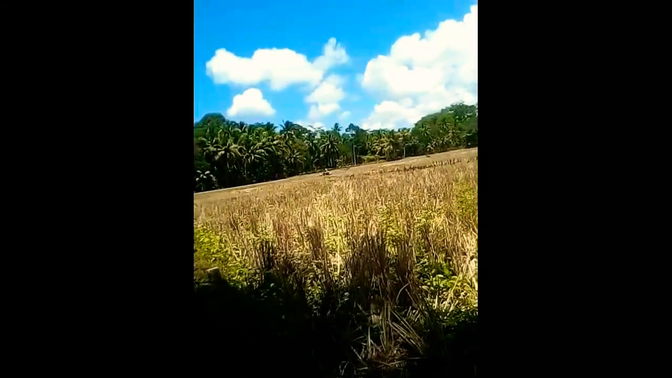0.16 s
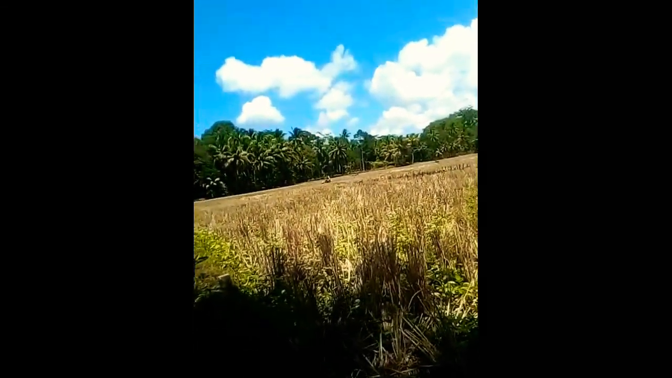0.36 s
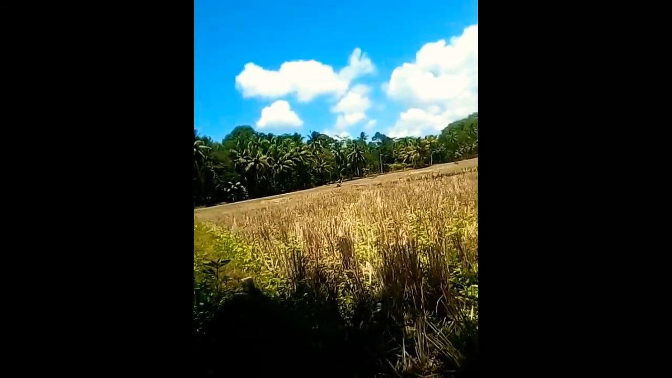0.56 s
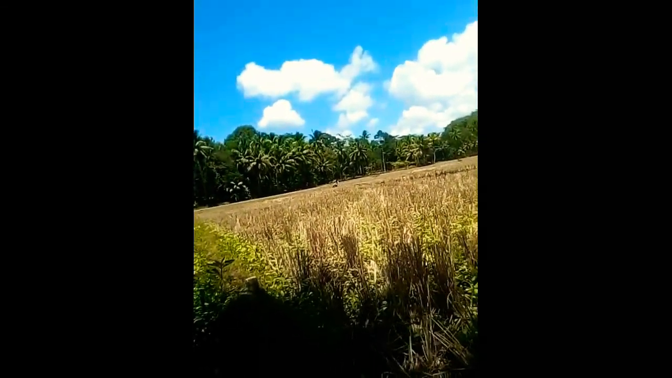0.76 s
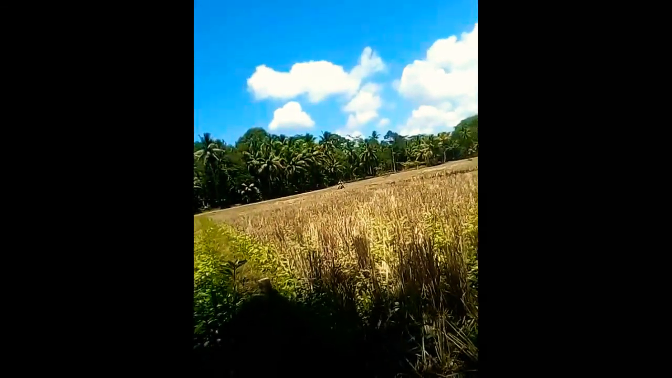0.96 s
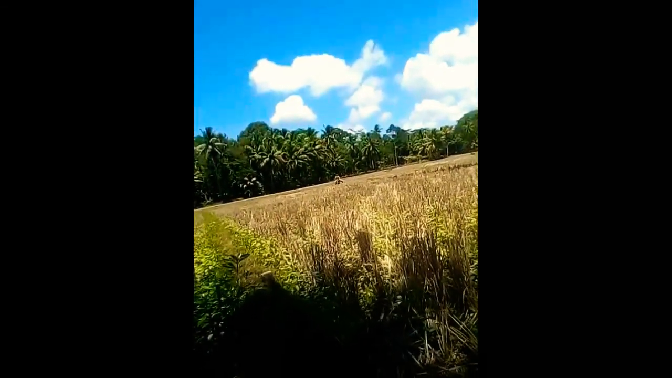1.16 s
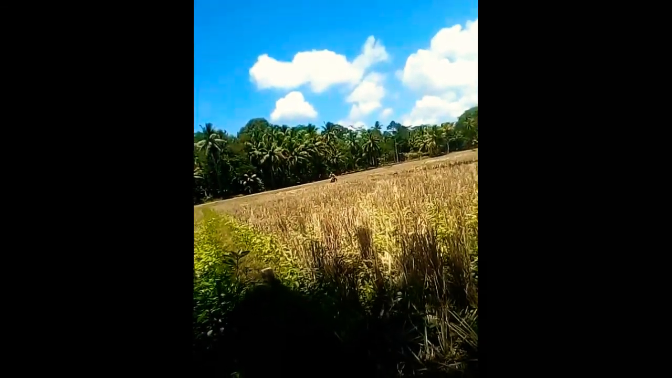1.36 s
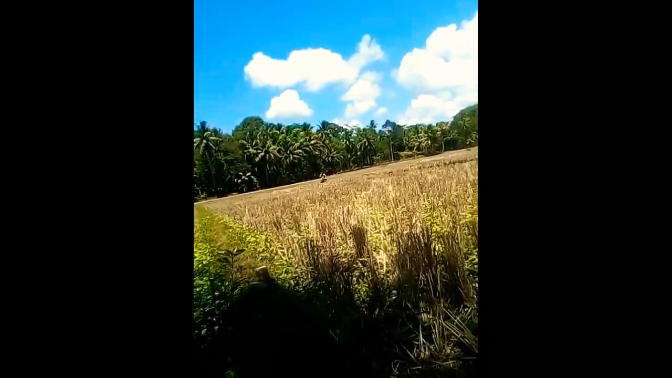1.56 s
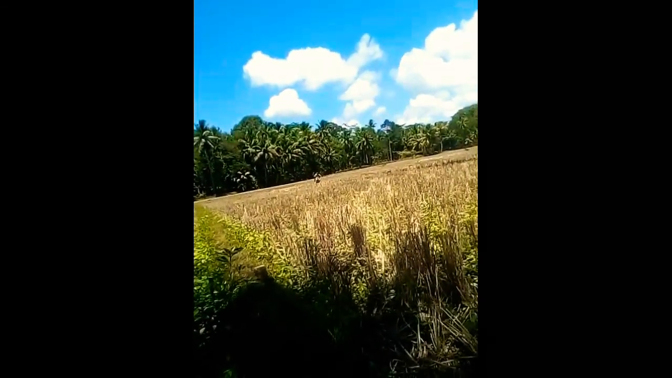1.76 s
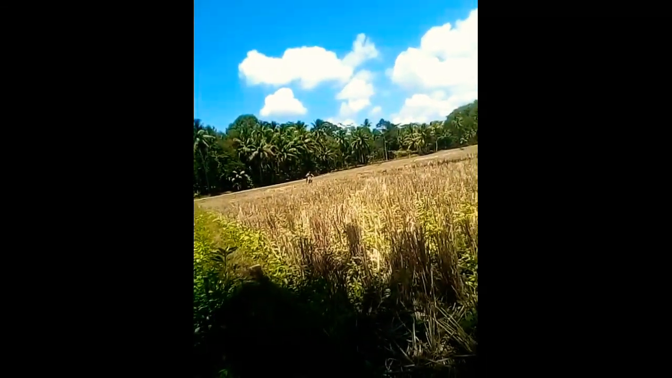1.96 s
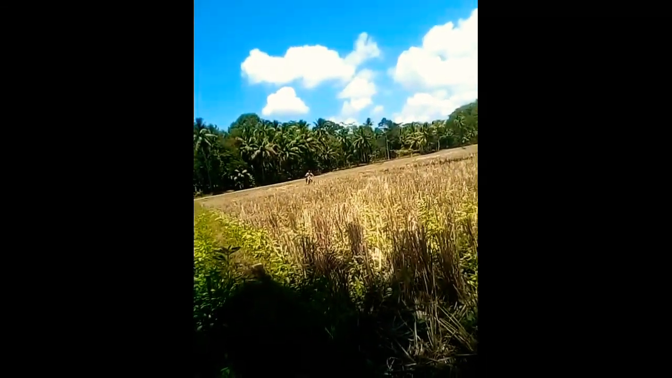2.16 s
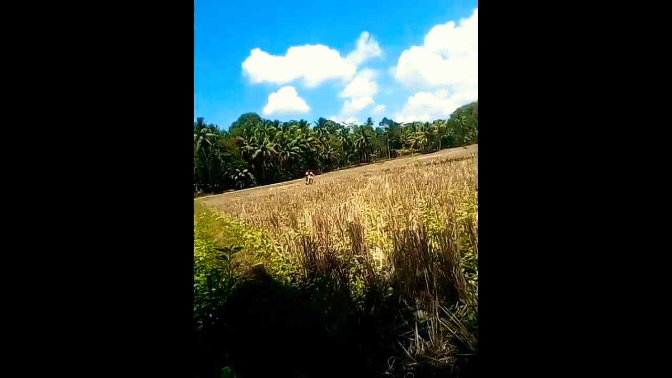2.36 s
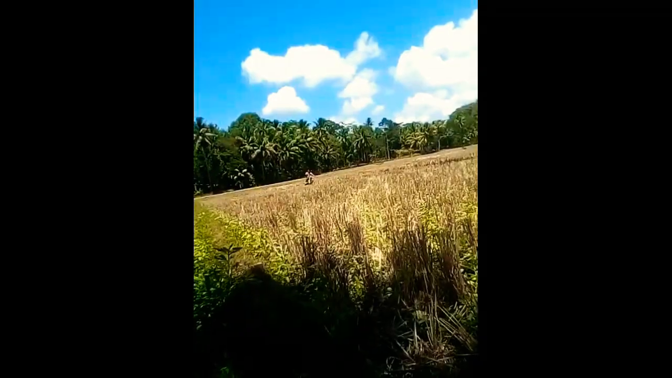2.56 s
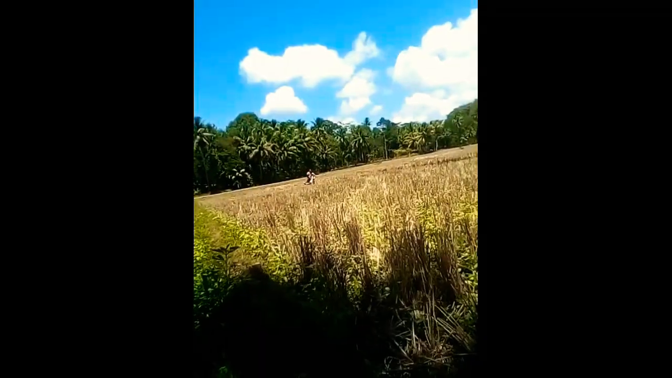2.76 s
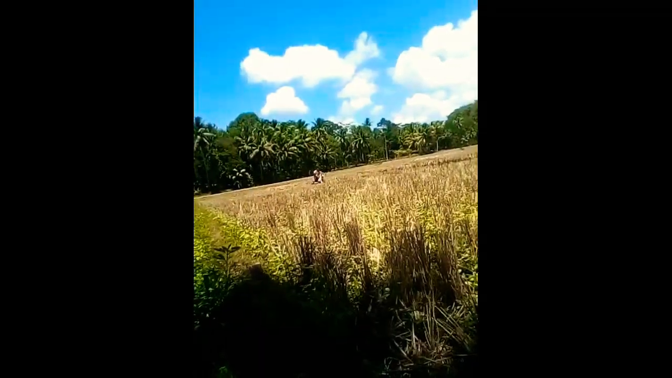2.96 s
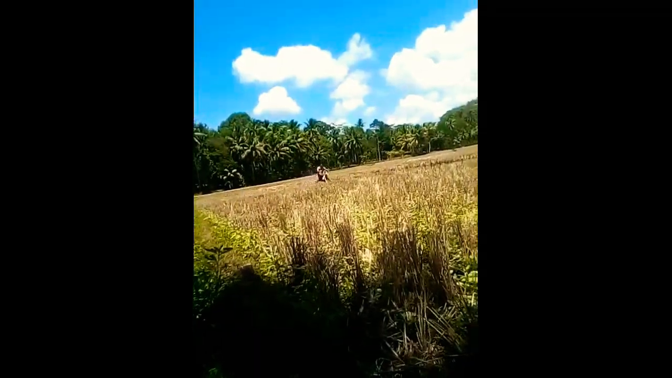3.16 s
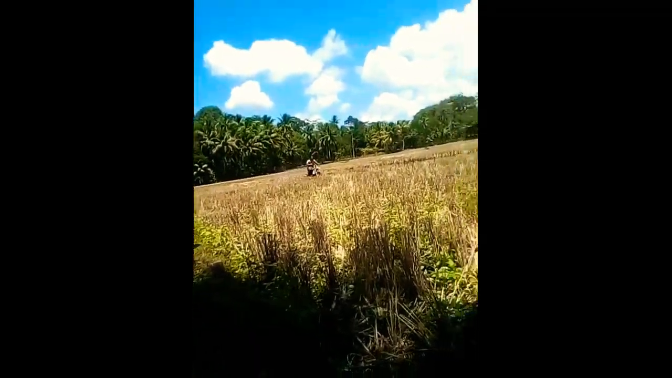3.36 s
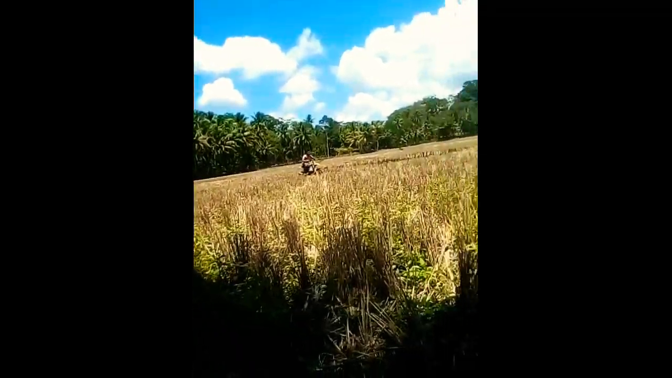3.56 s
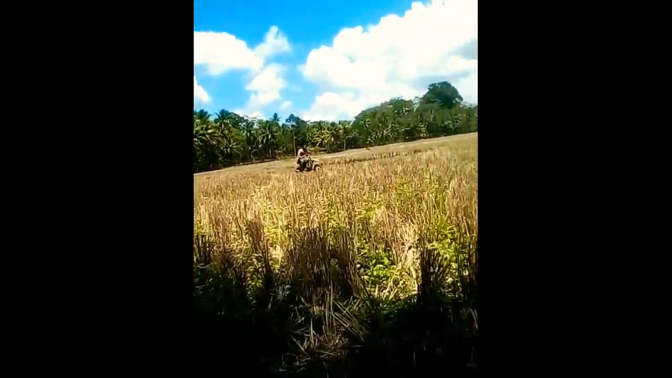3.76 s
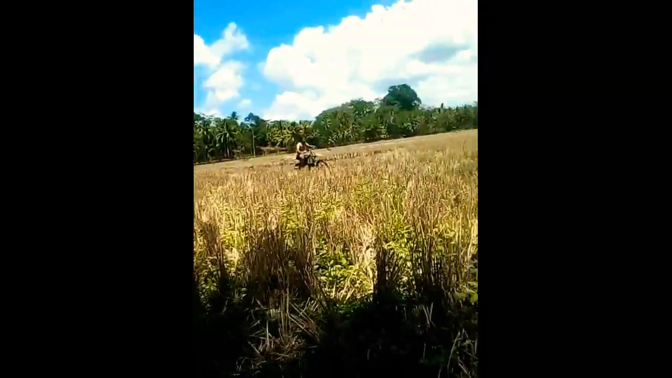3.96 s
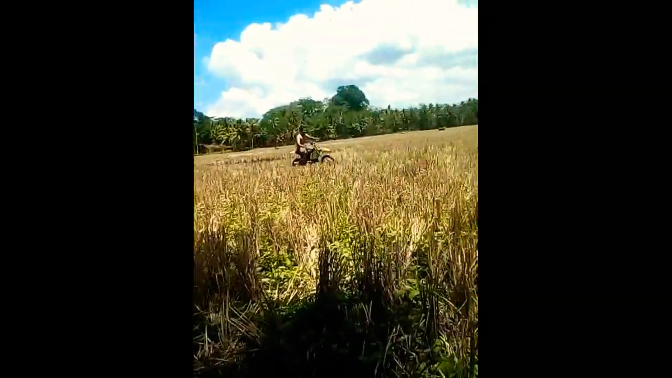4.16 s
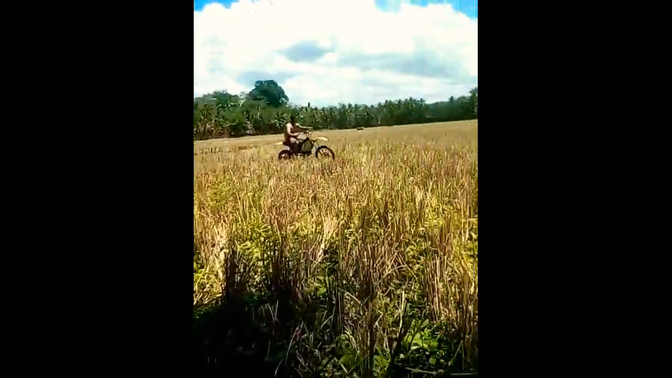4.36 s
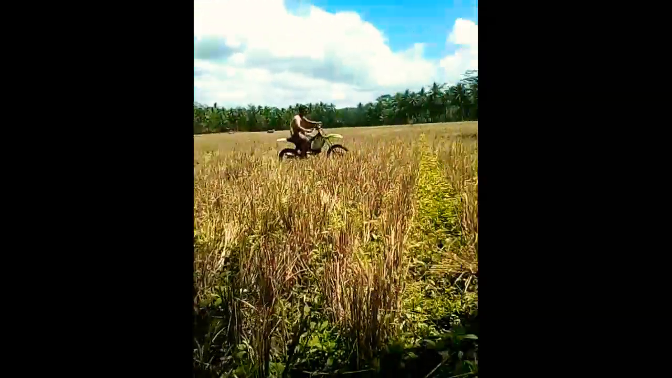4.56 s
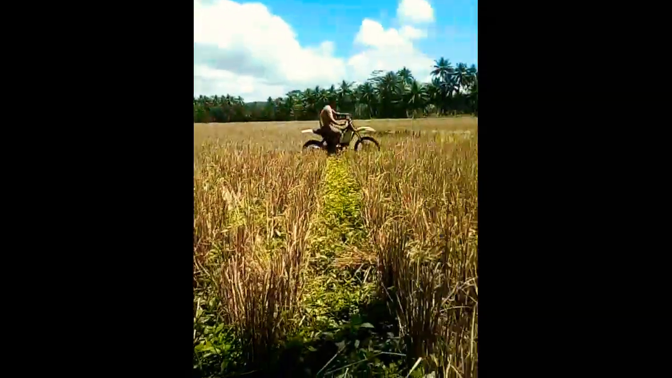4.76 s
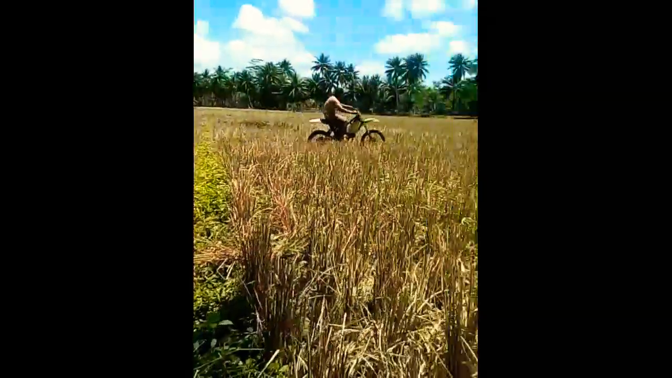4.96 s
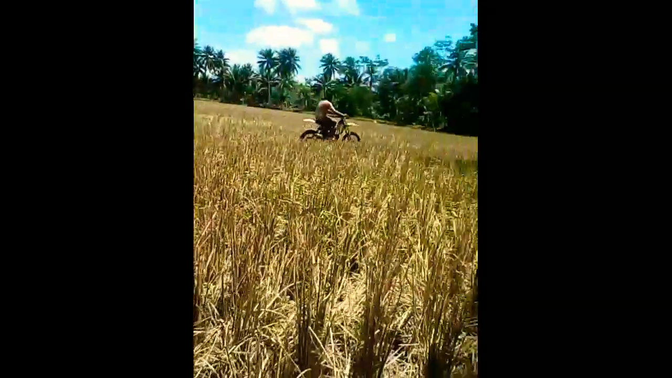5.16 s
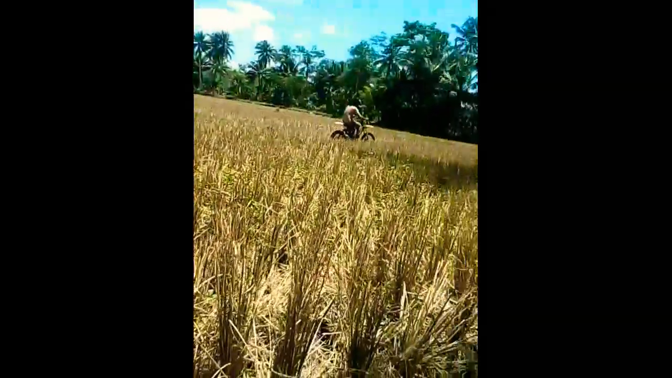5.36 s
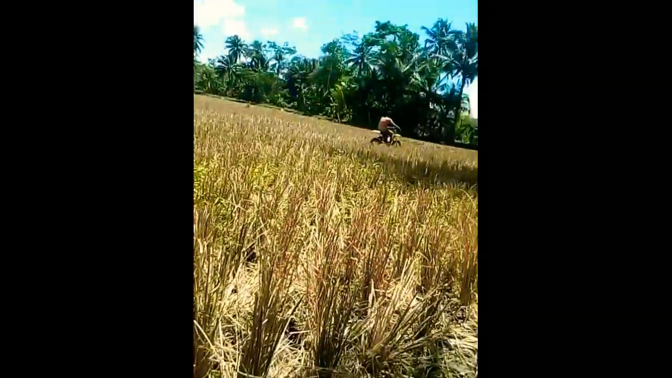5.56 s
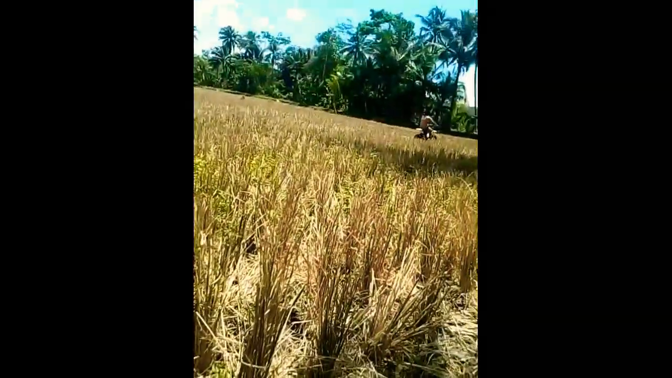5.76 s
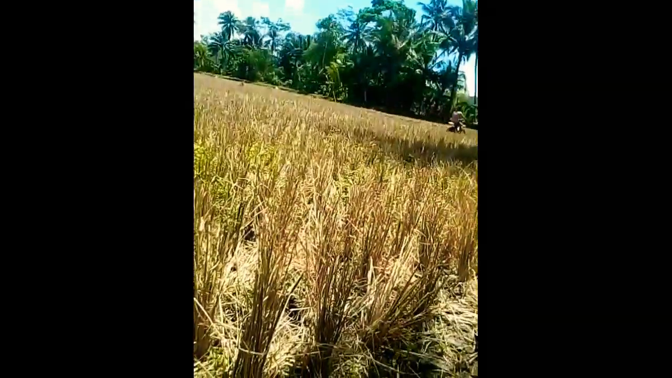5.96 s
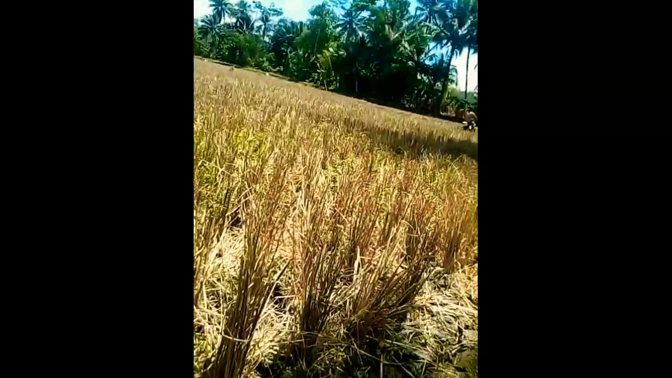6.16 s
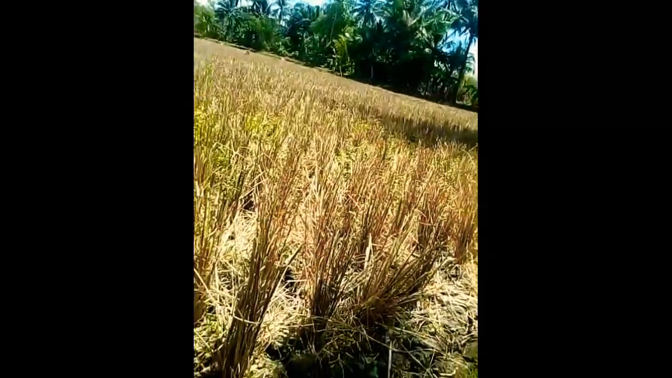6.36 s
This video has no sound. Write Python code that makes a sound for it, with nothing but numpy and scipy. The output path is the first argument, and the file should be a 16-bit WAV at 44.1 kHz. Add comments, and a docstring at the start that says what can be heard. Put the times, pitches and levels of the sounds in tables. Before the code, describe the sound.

In an open field with soft airy hush and light wind, a single-cylinder dirt bike is already running hard nearly sixty metres away. At 0 s its rasp is thin, uneven and smeared by scattered reflections, after a quick pitch flare and drop. It steadily grows; from about 1.4 s the revs climb, stutter on the limiter around 2.3 s, then drop with an upshift. The engine pulls again from about 3.2 s, louder, sharper and boomier, reaching another short stutter at 4.8 s before changing up. It rips past some ten metres away at 5.15 s, tyres faintly hissing and a wind gust thumping low on the microphone. At 5.5 s the throttle shuts: the crack collapses, a brief dull echo lingers from the trees, and the low puttering sinks and wobbles with a faint case rattle. Dry straw rustles underfoot at 6.2 and 6.4 s.

```python
"""A single-cylinder dirt bike comes across a stubble field from nearly 60 m off, over a light breeze.
Each firing booms in the exhaust and cracks through the silencer; field and trees scatter the crack.
At 2.3 s and 4.8 s it stutters on the rev limiter and changes up; the tyres hiss as it comes near.
It passes 10.7 m from the microphone at 5.15 s, shuts its throttle at 5.5 s and coasts with a faint rattle.
Gusts rumble on the microphone now and then; at 6.2 s and 6.4 s dry straw rustles underfoot."""
import sys
import numpy as np
from scipy import signal
from scipy.fft import rfft, irfft
from scipy.io import wavfile
from scipy.ndimage import uniform_filter1d, map_coordinates

SR = 44100
rng = np.random.default_rng(int(sys.argv[2]) if len(sys.argv) > 2 else 0)


def wrap_up_sound(samples):
    """Save the sound to the file named by the first command line argument, as 16-bit audio."""
    columns = np.atleast_2d(samples).T
    # keep every value between -1 and 1, then stretch to whole-number steps
    tamed = np.clip(columns, -1, 1)
    steps = np.round(tamed * 32767).astype(np.int16)
    wavfile.write(sys.argv[1], SR, steps)


N = 282240
TIME = np.arange(N) / SR
# a straight ride past the microphone
PASS_S, NEAREST_M, SPEED_M_PER_S = 5.15, 10.7, 10.87
# spans on the rev limiter, where every other stroke fires: start/s, end/s
LIMITER_SPANS = [(2.263, 2.345), (4.776, 4.84)]


def from_db(db):
    """Decibels to gain."""
    return 10 ** (np.asarray(db) / 20)


def in_time(rows):
    """Each column of a curve at every sample."""
    s, *columns = np.transpose(rows)
    return [np.interp(TIME, s, c) for c in columns]


def at_hz(points, hz):
    """Each column of a spectrum at the given frequencies, interpolated on a log axis."""
    known, *columns = np.transpose(points)
    return [np.interp(np.log(hz), np.log(known), c) for c in columns]


def within(times, spans):
    """Which times fall in any of the spans."""
    return np.any([(times > start) & (times < end) for start, end in spans], axis=0)


def drift(rate):
    """Slow random wander with a spread of about 1, up to roughly the given rate in Hz."""
    points = rng.standard_normal(int(2 * rate * N / SR) + 4)
    return map_coordinates(points, [2 * rate * TIME], order=3, mode="nearest")


def doublings():
    """How many times the bike's distance has doubled from its nearest."""
    distance_m = np.hypot(NEAREST_M, SPEED_M_PER_S * (TIME - PASS_S))
    return np.log2(distance_m / NEAREST_M)


def cut(x, hz, kind, order=2):
    """Butterworth filter."""
    return signal.sosfilt(signal.butter(order, hz, kind, fs=SR, output="sos"), x + 1e-18)


def hollow(x, nulls):
    """One notch per antiresonance (Hz, width Hz)."""
    for hz, width in nulls:
        x = signal.lfilter(*signal.iirnotch(hz, hz / width, fs=SR), x)
    return x


def even(x, size=2600):
    """Holds the rms near 1 over a few firings."""
    power = uniform_filter1d(uniform_filter1d(x * x, size), size)
    return x / np.sqrt(np.maximum(power, 1e-20))


def resonate(x, modes):
    """Parallel two-pole resonances, each with its own gain at the peak."""
    out = np.zeros(N)
    for hz, width, db in modes:
        r = np.exp(-np.pi * width / SR)
        poles = [1, -2 * r * np.cos(2 * np.pi * hz / SR), r * r]
        out += from_db(db) * (1 - r * r) / 2 * signal.lfilter([1, 0, -1], poles, x + 1e-18)
    return out


def noise(colour):
    """Steady noise of a given spectrum, rms 1."""
    bins = np.maximum(np.arange(N // 2 + 1) * SR / N, 1)
    x = irfft(rfft(rng.standard_normal(N)) * from_db(at_hz(colour, bins)[0]), N)
    return x / x.std()


def clicks(times, sizes):
    """One impulse per stroke, placed between samples."""
    at = np.clip(times * SR, 0, N - 2)
    whole = at.astype(int)
    early = np.bincount(whole, sizes * (1 - at + whole), N)
    late = np.bincount(whole + 1, sizes * (at - whole), N)
    return early + late


def causal(db):
    """Minimum-phase responses of the given levels: a sharp front, then the ringing."""
    cepstrum = irfft(np.log(from_db(db)))
    half = cepstrum.shape[1] // 2
    cepstrum[:, 1:half] *= 2
    cepstrum[:, half + 1:] = 0
    return np.exp(rfft(cepstrum))


def scatter(x, t60, shifts_per_s):
    """Countless faint echoes from stubble and trees: a drifting blend of three decaying patterns."""
    t = TIME[:SR]
    echoes = rng.standard_normal((3, SR)) * from_db(-60 * t / t60) * (t > .002)
    shares = np.array([drift(shifts_per_s) for _ in echoes])
    shares = shares / np.sqrt(np.sum(shares ** 2, axis=0) + .2)
    out = np.zeros(N)
    for share, pattern in zip(shares, echoes):
        out += share * signal.fftconvolve(x, pattern)[:N] / np.sqrt(np.sum(pattern ** 2))
    return out


def strokes():
    """Times of the exhaust strokes, one per engine cycle, and whether the charge has fired."""
    # engine speed through two gear changes, jolted by the ground, sinking as it coasts: t/s, strokes per s/Hz
    revs = [(0.0, 63.7), (0.24, 77.9), (0.32, 71.5), (0.44, 67.3), (0.48, 68.1), (0.64, 64.5), (0.68, 65.3),
            (0.72, 69.5), (0.84, 71.3), (0.88, 67.2), (0.96, 62.4), (1.16, 65.0), (1.32, 65.6),
            (1.44, 67.9), (1.48, 71.8), (1.52, 69.1), (1.68, 73.7), (1.84, 77.8), (1.88, 77.0),
            (1.96, 82.0), (2.0, 76.2), (2.04, 81.7), (2.16, 83.4), (2.24, 96.3), (2.36, 96.2), (2.44, 71.3),
            (2.48, 67.0), (2.56, 68.3), (2.6, 66.3), (2.72, 68.8), (2.76, 64.9), (2.84, 64.7), (3.04, 67.6),
            (3.12, 61.1), (3.2, 65.2), (3.24, 63.5), (3.28, 67.0), (3.4, 68.3), (3.44, 66.4), (3.48, 69.2),
            (3.56, 67.2), (3.68, 69.9), (3.8, 70.4), (3.88, 69.2), (4.0, 72.5), (4.08, 71.3), (4.12, 74.5),
            (4.2, 73.5), (4.36, 78.0), (4.4, 72.2), (4.48, 74.6), (4.52, 73.7), (4.64, 79.5), (4.68, 83.3),
            (4.76, 94.9), (4.84, 94.7), (4.92, 70.2), (5.04, 64.6), (5.16, 60.9), (5.2, 62.7), (5.36, 59.0),
            (5.48, 59.1), (5.52, 53.6), (5.68, 46.4), (5.76, 46.8), (5.96, 39.4), (6.0, 41.2), (6.08, 48.9),
            (6.12, 43.9), (6.2, 48.8), (6.28, 45.6), (6.4, 45.0)]
    # around the gear changes nothing fires: start/s, end/s
    ignition_gaps = [(2.345, 2.377), (2.425, 2.438), (4.84, 4.873)]
    start_cycle = -.163
    cycles = start_cycle + np.cumsum(in_time(revs)[0]) / SR
    times = np.interp(np.arange(0, cycles[-1]), cycles, TIME)
    fired = ~within(times, ignition_gaps)
    for span in LIMITER_SPANS:
        fired[np.flatnonzero(within(times, [span]))[::2]] = False
    # rough ground moves the strokes a little early or late, more so far out
    shake_s, shake_per_doubling_s, shakes_per_s = .00003, .00008, 12
    shake = (shake_s + shake_per_doubling_s * doublings()) * drift(shakes_per_s)
    return times + np.interp(times, TIME, shake), fired


def exhaust_boom(times, fired, unfired_db, unfired_late_s, pipe_delay_s, uneven_db,
                 gap_hz, null_hz, top_hz, puff_hz, puff_s, puff_delay_s):
    """Each slug of gas rings the pipe; its short puff stands out once the outlet faces the microphone."""
    # level of the boom under its puff and waver: t/s, level/dB
    boom_level = [(0.0, -19.5), (0.27, -26.3), (0.63, -19.5), (0.72, -23), (0.78, -28), (0.84, -21.5),
                  (0.99, -23.0), (1.08, -19.5), (1.23, -23), (1.29, -19.5), (1.38, -21.5), (1.44, -20.5),
                  (1.5, -23), (1.62, -21.5), (1.68, -24), (1.71, -21.5), (1.98, -22.5), (2.01, -19.5),
                  (2.16, -20.4), (2.22, -23.6), (2.34, -20.5), (2.37, -23.3), (2.49, -19.5), (2.79, -16.7),
                  (3.0, -18), (3.21, -16.5), (3.27, -19.5), (3.69, -17), (3.81, -17.5), (3.96, -15.5),
                  (4.2, -15.5), (4.35, -11), (4.44, -14.5), (4.62, -11.5), (4.86, -14), (4.89, -12.5),
                  (5.07, -14.8), (5.49, -16), (5.52, -11.5), (5.76, -11.5), (5.91, -14), (6.4, -13.5)]
    # resonances of the pipe, levels relative to one another: f/Hz, width/Hz, level/dB
    pipe_modes = [(72.5, 17, -19), (131.6, 31.5, 29), (200, 7.7, -15.5)]
    sizes = from_db(np.where(fired, 0, unfired_db) + uneven_db * rng.standard_normal(len(times)))
    times = times + unfired_late_s * ~fired   # an unfired stroke still pumps air, but it leaves later

    pipe = resonate(clicks(times + pipe_delay_s, sizes), pipe_modes)
    pipe = cut(pipe, [58, top_hz], "band")
    # antiresonances between and above the first pipe modes
    pipe = .3 * pipe + 0.43 * hollow(pipe, [(gap_hz, gap_hz / 4)])
    pipe = hollow(pipe, [(null_hz, null_hz / 2)])

    t = np.arange(-SR // 50, SR // 50) / SR
    # gas surges out and is sucked back
    surge = -np.sin(2 * np.pi * puff_hz * t) * np.exp(-.5 * (t / puff_s) ** 2)
    puff = signal.fftconvolve(clicks(times + puff_delay_s, sizes), surge, "same")

    far = doublings()
    puff_db = -3 - 12 * far * (TIME < PASS_S)   # loses 12 dB per doubling of distance on the approach
    waver_db_per_doubling, wavers_per_s = 0.2, 9.5
    boom_db = in_time(boom_level)[0] + waver_db_per_doubling * far * drift(wavers_per_s)
    return from_db(boom_db) * even(even(pipe) + from_db(puff_db) * even(puff))


def exhaust_colour(at, hz):
    """dB of each firing's crack; the resonances slide with the angle from which the exhaust is heard."""
    # strength of the crack, set by throttle and distance: t/s, level/dB
    crack_level = [(0.0, -9.5), (0.5, -5.5), (0.75, -1.0), (1.2, 0.6), (1.6, 3), (1.9, 2), (2.1, 5),
                   (2.22, 9), (2.5, 8.0), (3.0, 12.5), (3.5, 14), (3.8, 14.5), (4.3, 16.5), (4.7, 16.5),
                   (4.95, 18.5), (5.2, 19.5), (5.49, 18.5), (5.53, 2), (5.7, -5), (6.4, -18)]
    # height of the silencer's ring, which flares and fades on the way: t/s, level/dB
    silencer_level = [(0.0, -3), (1.2, -1), (1.42, 7), (1.75, 11.5), (1.88, -4), (2.06, -4), (2.21, 10),
                      (2.7, 7), (3.05, 6), (3.35, 10.5), (3.8, 4), (4.2, 6.5), (4.72, 7.5), (5.03, 4),
                      (5.22, -4), (6.4, 2)]
    # lift or loss of the treble in the crack: t/s, level/dB
    treble_level = [(0.0, 2.5), (0.599, -11), (1.6, -7.5), (1.8, -0.7), (2.302, 1.2), (2.6, 2.1),
                    (2.9, -4.5), (3.4, -4), (3.8, 2), (4.3, 3), (5.099, 1.5), (5.48, 4), (5.699, 6.5),
                    (6.4, 5)]
    # broad colour of the crack: f/Hz, level/dB
    crack_colour = [(300, 3), (600, -1.8), (1200, -1.67), (2500, 2.5), (3800, -7), (6800, -24.5),
                    (8200, -41.5), (11000, -58), (15000, -62.5)]
    # peaks and dips of pipe and silencer: f/Hz, width/Hz, level/dB, gain per doubling of distance/dB,
    # gain as the bike swings past/dB, shift as it swings past/Hz
    exhaust_modes = [(411, 40, -7.5, 1, -2.5, 29.5), (484, 91, -3.25, 6, 16, -66),
                     (783.0, 104, 1.5, 2.8, 2.5, -31.0), (988, 81, -7.5, 3, -4.8, -32.5),
                     (1182, 103, 5.5, -0.3, 2.5, -94), (1680, 158, -2.5, 0.0, -16, 79.5),
                     (2435, 88, -5.5, 2.3, -7, 118), (2680, 80, 7.5, -5, -11.5, 117),
                     (3360.0, 285, -5.1, -0.5, -9, -66.0), (4596.0, 377, -10, 5.5, -3.5, 42.5),
                     (5810, 310, -11.5, 6.5, 3.5, 241.5), (6434.0, 210, 6, 1.6, 0, -314.0)]
    curves = (crack_level, silencer_level, treble_level)
    level, ring, treble = [in_time(curve)[0][at, None] for curve in curves]
    far = doublings()[at, None]
    swing_s, swing_length_s = 4.81, 0.91   # middle and half-length of the swing past the microphone
    swing = .5 + .5 * np.tanh((TIME[at, None] - swing_s) / swing_length_s)

    def bell(centre, width):
        """A Gaussian hump over frequency."""
        return np.exp(-.5 * np.minimum(((hz - centre) / width) ** 2, 50))

    treble_hz, crack_low_hz = 3300, 318
    db = level + at_hz(crack_colour, hz)[0]
    db = db + treble / (1 + (treble_hz / hz) ** 6)
    db = db - 10 * np.log10(1 + np.minimum(crack_low_hz / hz, 3) ** 12)   # steep loss of bass
    # a gap between the pipe's low modes opens as the bike passes
    gap_db, gap_hz, gap_width_hz = 16, 380, 39
    db = db - gap_db * swing ** 3 * bell(gap_hz, gap_width_hz)
    silencer_hz, silencer_rise_hz, silencer_width_hz = 2125, 90, 197
    db = db + ring * bell(silencer_hz + silencer_rise_hz * swing, silencer_width_hz)
    for centre, width, height, far_db, past_db, rise in exhaust_modes:
        db = db + (height + far_db * far + past_db * swing) * bell(centre + rise * swing, width)
    return db


def exhaust_crack(times, fired, unfired_db, jet_s, uneven_db, scatter_t60, front_early_s, size=2048):
    """A pressure front and a burst of turbulent gas ring pipe and silencer; the field scatters part."""
    # turbulent jet over pressure front, scattered over direct sound when nearest: f/Hz, jet/dB, scatter/dB
    diffuseness = [(400, -19, -6), (1120, -14, -8.5), (2250, -9, -12.5), (4200, 1, -7), (8000, 3, -7.5)]
    lead_s = .003   # each crack's frame opens this far ahead of its stroke
    at = np.clip((times - lead_s) * SR, 0, N - 1).astype(int)
    hz = np.maximum(np.arange(size // 2 + 1), 1) * SR / size
    jet_gain, wet = from_db(at_hz(diffuseness, hz))
    wet = wet * from_db(5 * doublings()[at, None])   # 5 dB more scatter per doubling of distance

    size_db = np.where(fired, 0, unfired_db) + uneven_db * rng.standard_normal(len(at))
    size_db = size_db + 2.5 * (fired & within(times, LIMITER_SPANS))   # a firing after a skip bangs harder
    burst = np.exp(-np.arange(size) / (jet_s * SR))
    jet = rfft(rng.standard_normal((len(at), size)) * burst / np.sqrt(np.sum(burst ** 2)))
    source = (jet_gain * jet - 1) / np.hypot(1, jet_gain)   # the -1 is the pressure front

    late = np.exp(-2j * np.pi * hz * (times - front_early_s - at / SR)[:, None])   # delay within the frame
    cracks = from_db(size_db)[:, None] * late * causal(exhaust_colour(at, hz)) * source
    cracks = cracks / np.hypot(1, wet)   # direct and scattered share the power
    samples = (at[:, None] + np.arange(size)).ravel()
    direct = np.bincount(samples, irfft(cracks).ravel(), N)[:N]
    scattered = np.bincount(samples, irfft(cracks * wet).ravel(), N)[:N]
    return direct + scatter(scattered, t60=scatter_t60, shifts_per_s=4)


def tree_echo(crack):
    """The far trees throw the crack back, dulled; it lingers when the throttle shuts."""
    return from_db(-15.5) * cut(scatter(crack, t60=0.73, shifts_per_s=2), 4500, "low")


def wind():
    """A light breeze and a few gusts rumble on the microphone: low noise under a varying swell."""
    # gusts on the microphone: t/s, length/s, level/dB
    gusts = [(1.244, 0.16, -46), (3.109, 0.37, -34.5), (5.106, 0.22, -27), (6.053, 0.16, -35)]
    # rumble of moving air: f/Hz, level/dB
    wind_colour = [(10, -4), (24, -4), (48, -24), (100, -13), (300, -33), (1000, -90)]
    swell = from_db(-44.5)   # the steady breeze
    for s, length, db in gusts:
        swell = swell + from_db(db) * np.exp(-.5 * ((TIME - s) / length) ** 2)
    return swell * even(noise(wind_colour), size=SR // 5)


def field_air(level_db, flutter_db):
    """The open field's air is a steady coloured noise that flutters slightly in level."""
    # hush of the place: f/Hz, level/dB
    air_colour = [(100, -0.5), (300, -6), (600, -0.5), (1200, 0.5), (1700, -5.5), (2700, -6.5), (3300, -15),
                  (6700, -24.5), (8000, -61.5), (12000, -46), (15500, -47.5)]
    return from_db(level_db + flutter_db * drift(4.4)) * noise(air_colour)


def tyres(flutter_db):
    """The wheels hiss through the stubble while the bike is near: noise that falls off with distance."""
    # hiss of the stubble: f/Hz, level/dB
    stubble_colour = [(1500, -18.5), (4000, -6), (5500, -2.5), (7000, -6.5), (8000, -24.5), (15000, -39.5)]
    nearest_db, loss_db_per_doubling = -52, 18.5
    level_db = nearest_db - loss_db_per_doubling * doublings() + flutter_db * drift(6.8)
    return from_db(level_db) * noise(stubble_colour)


def coasting_rattle(times, level_db, uneven_db, roughness):
    """With the throttle shut, the knocking of the engine rings faintly in its case."""
    # ring of the case: f/Hz, width/Hz, level/dB
    case_modes = [(1093, 24, 0)]
    throttle_shut_s = 5.51
    knocks = clicks(times, from_db(uneven_db * rng.standard_normal(len(times))))
    ring = resonate(knocks / knocks.std() + roughness * rng.standard_normal(N), case_modes)
    coasting = uniform_filter1d(1. * (TIME > throttle_shut_s), size=2000)
    return from_db(level_db) * even(ring) * coasting


def straw(snaps_per_s):
    """Stalks brushed underfoot give a short swell of tiny random snaps."""
    # brushes of dry straw: t/s, length/s, level/dB
    brushes = [(6.231, 0.026, -37.5), (6.366, 0.016, -42)]
    # colour of the snaps: f/Hz, level/dB
    straw_colour = [(300, -19), (1100, 25.5), (1700, -1), (2400, 9), (3800, 8.5), (6000, 4.5), (8000, -36),
                    (15000, -62)]
    swell = np.zeros(N)
    for s, length, db in brushes:
        swell += from_db(db) * np.exp(-.5 * ((TIME - s) / length) ** 2)
    snap_decay_s = 0.0048
    snaps = rng.random(N) < snaps_per_s / SR
    grain = signal.lfilter([1], [1, -np.exp(-1 / (snap_decay_s * SR))], snaps)
    return swell * even(grain * noise(straw_colour))


def scene():
    """The bike, its echo, the wind, the air of the field and the straw."""
    times, fired = strokes()
    boom = exhaust_boom(times, fired, unfired_db=-1.5, unfired_late_s=0.001, pipe_delay_s=0.00073,
                        uneven_db=1.23, gap_hz=93.6, null_hz=264.5, top_hz=268,
                        puff_hz=171.0, puff_s=0.0023, puff_delay_s=0.00457)
    crack = exhaust_crack(times, fired, unfired_db=-13.5, jet_s=0.0042, uneven_db=0.3,
                          scatter_t60=0.86, front_early_s=.0004)
    bike = boom + crack + tree_echo(crack)
    place = wind() + field_air(level_db=-41.5, flutter_db=1.6)
    bike = bike + tyres(flutter_db=1.5)
    bike = bike + coasting_rattle(times, level_db=-46.0, uneven_db=5.5, roughness=0.47)
    return (bike + place + straw(snaps_per_s=1500))[None]


def record(dry):
    """The tallest peaks are softly rounded and the top is cut."""
    excess = dry - dry / (1 + (dry / .85) ** 6) ** (1 / 6)
    # only the excess below 6.5 kHz is taken away
    rounded = dry - signal.fftconvolve(excess, signal.firwin(41, 6500, fs=SR)[None], "same")
    stop_hz, stop_db = 16300, 70
    return signal.sosfilt(signal.cheby2(12, stop_db, stop_hz, fs=SR, output="sos"), rounded)


dry = scene()
out = record(dry)
wrap_up_sound(out)
```